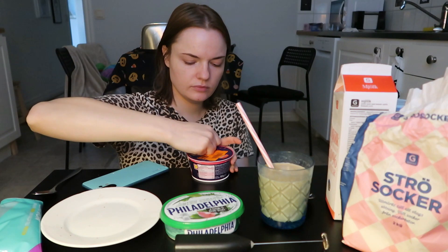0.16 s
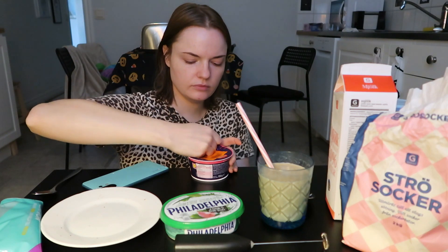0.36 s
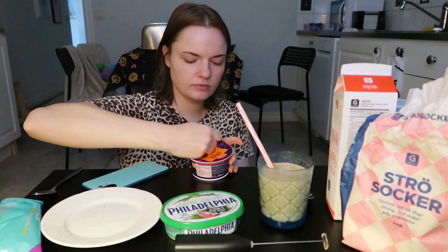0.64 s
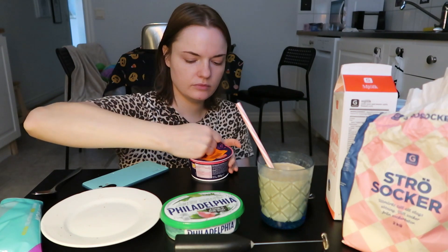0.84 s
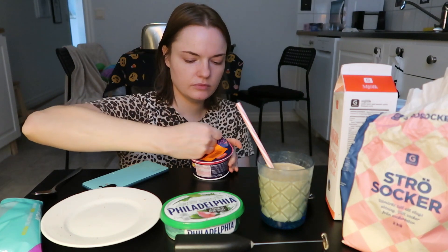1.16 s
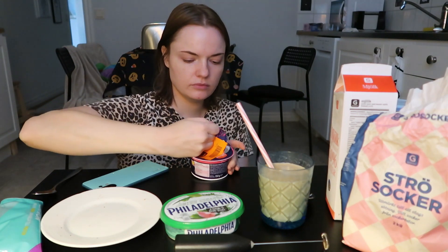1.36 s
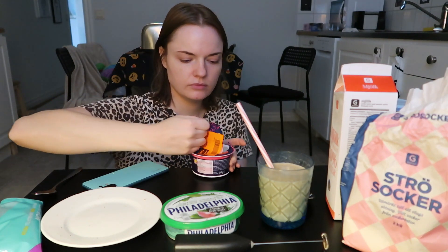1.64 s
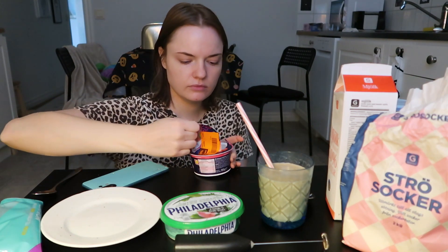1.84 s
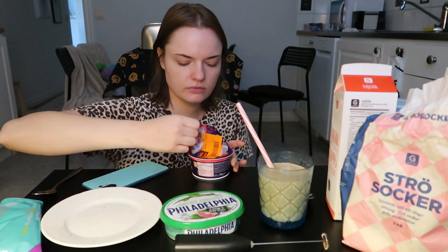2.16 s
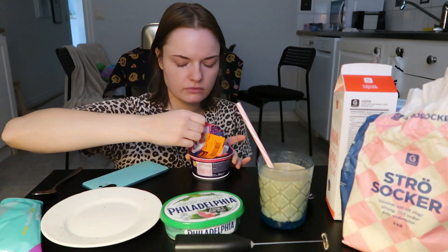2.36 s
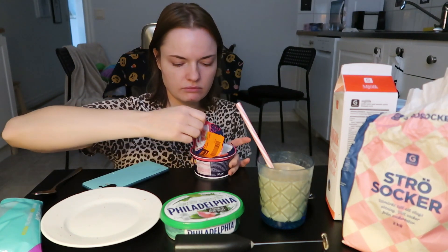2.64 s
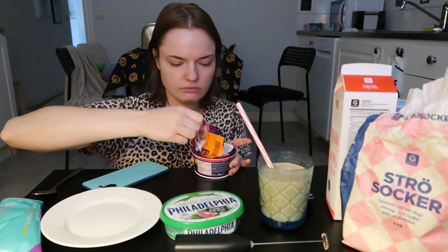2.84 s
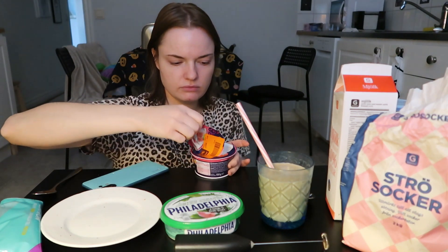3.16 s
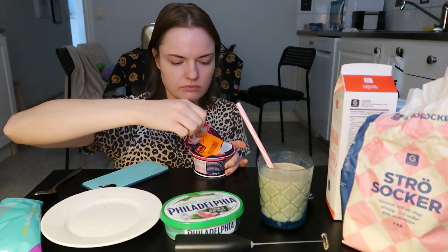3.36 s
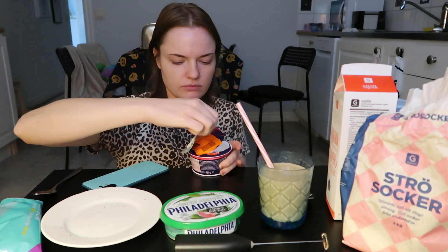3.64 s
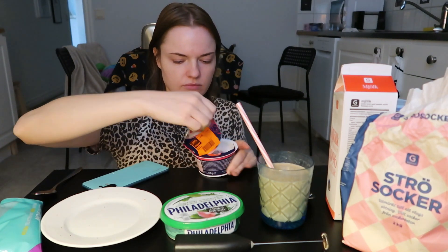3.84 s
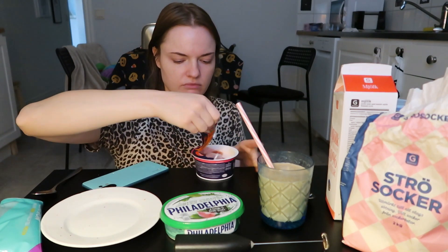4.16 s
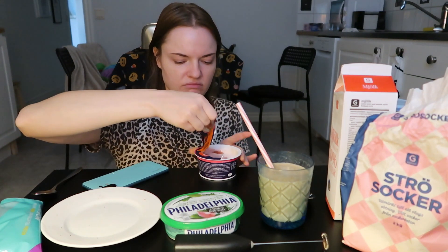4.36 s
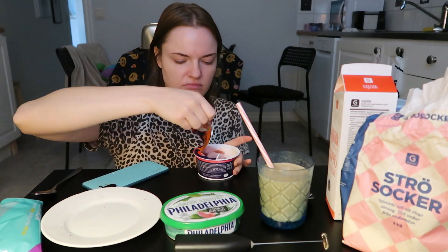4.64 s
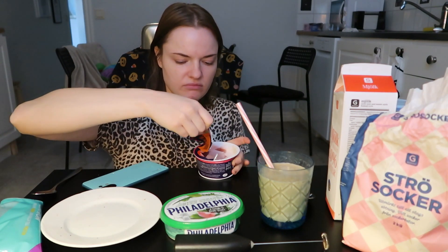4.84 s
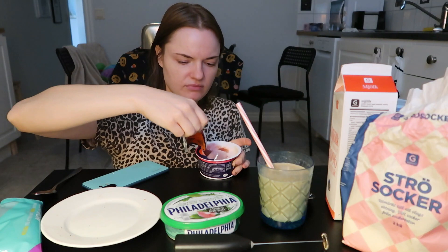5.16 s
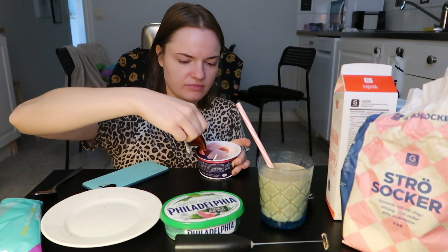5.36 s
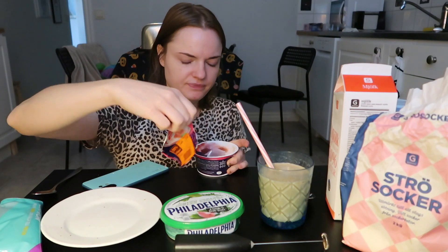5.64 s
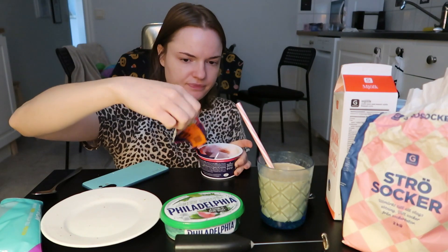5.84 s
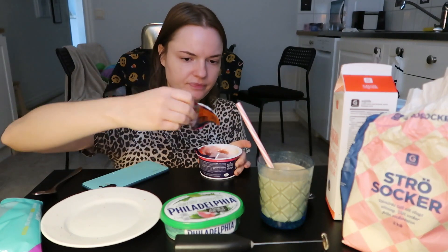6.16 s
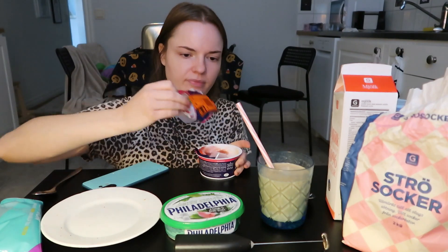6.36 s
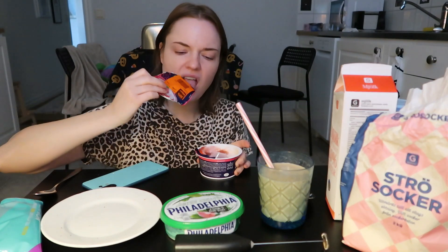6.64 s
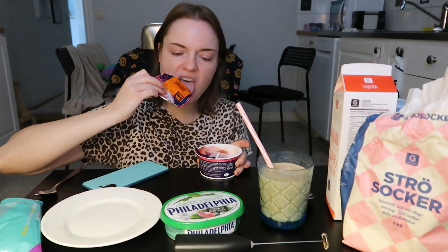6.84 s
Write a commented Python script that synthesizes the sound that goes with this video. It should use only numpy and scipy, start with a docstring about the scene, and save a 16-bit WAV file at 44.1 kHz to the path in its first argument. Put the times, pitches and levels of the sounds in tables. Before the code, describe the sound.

Close stereo microphones in a small, hard kitchen with low house rumble, faint wavering hum and hiss. A barely audible ring dies away at the start. At 0.4 s the foil cracks and the tub bumps the table softly; a lighter snap follows at 0.65. From 0.95 to 1.4 s comes the loudest passage: rapid, bright, tinny buckles with crackling, turning briefly hollow until about 1.6. It quiets, with a dull knock at 2.2 and faint crinkles and rubbing to 2.7. From 3.15 to 4.3 s dry crackles, small snaps and short stick-slip slides return, ending in a solid woody thump at 4.25. Light crinkles and very soft bumps continue from 4.6 to 5.4. A short rip peaks sharply at 5.69 s. After a lull, the loose foil crackles crisply at 6.4 to 6.7, then fades to room tone.

```python
"""Peeling the foil lid off a yogurt tub

A foil lid is peeled off a plastic tub on a kitchen table, close to a pair of microphone ports.
The foil buckles with sharp snaps (damped modes and noise cracks), the seal rips in short bursts
and the loose lid crinkles (random fractures, coloured); the tub knocks (table modes) and slides
(stick-slip grains). A small hard room answers with decaying noise, over house noise, hum and hiss.
"""
import sys
import numpy as np
from scipy import signal
from scipy.fft import rfft, irfft, next_fast_len
from scipy.io import wavfile
from scipy.ndimage import map_coordinates

SR = 44100
rng = np.random.default_rng(int(sys.argv[2]) if len(sys.argv) > 2 else 0)


def log_audio(samples):
    """Write samples as a 16-bit WAV file to the path given in sys.argv[1]."""
    # one column per channel
    frames = np.atleast_2d(samples).T
    # limit to full scale, then quantise
    limited = np.clip(frames, -1, 1)
    pcm = np.round(limited * 32767).astype(np.int16)
    wavfile.write(sys.argv[1], SR, pcm)


N = 308259

# buckles of the foil, levels before trims: start_s, lid_level_db, lid_mode_hz, crease_mode_hz,
# crease_level_db, crack_level_db, facet_pan_db (left minus right)
BUCKLES = [(0.375, -32, 895, 2550, -36, -31, -1.5), (0.418, -41, 875, 2662, -19, -34, -0.5),
           (0.673, -29.5, 570, 2670, -43.5, -55, -5), (0.953, -24.5, 703, 2660, -28.5, -19, -10.5),
           (0.980, -33, 1000, 2780, -60, -46, 1), (1.030, -30, 600, 2410, -67, -44, -2),
           (1.075, -19, 1630, 2420, -33.5, -17, -3.5), (1.166, -17.5, 1525, 2120, -61.5, -36.5, -4),
           (1.17, -24.5, 860, 2080, -30, -33.5, 2), (1.242, -17, 1460, 3730, -30, -18, -2.5),
           (1.296, -44, 1040, 2820, -32, -24, 1), (1.308, -28, 1400, 2830, -67, -26, -1.5),
           (1.4, -29.5, 1600, 3010, -31, -46, -3.5), (2.294, -50, 530, 4440, -70, -42, 3),
           (3.292, -45.5, 1120, 2460, -49.5, -59, 5), (3.423, -65, 509, 3350, -73, -32, 0),
           (3.456, -47, 1950, 2120, -47.5, -45.5, -2), (3.533, -43, 834, 3180, -63, -50, 0),
           (3.571, -43, 1040, 2550, -41.5, -45.5, 5.5), (3.752, -54, 1610, 3780, -65, -32.5, -6),
           (3.839, -30, 1950, 3420, -36.5, -30, 6.5), (4.025, -37, 550, 2580, -41.5, -34, 6),
           (4.252, -31, 1310, 2760, -32.5, -26, 6), (4.643, -48.5, 503, 2900, -56.5, -43.5, 1.5),
           (5.04, -49.5, 554, 2420, -49.5, -49.5, -2), (5.107, -41, 890, 2350, -43, -47.5, 4),
           (5.139, -34, 840, 2280, -33, -52, 0.5), (5.143, -36.5, 1610, 2770, -38.5, -41.5, 10),
           (5.685, -52, 680, 3750, -31.5, -21, -5), (5.699, -42.5, 980, 2570, -38.5, -38, 9.5),
           (6.1, -60, 538, 4440, -75, -52.5, 4)]
# colour of tiny creases in the foil: freq_hz, level_db
CREASE_COLOUR = [(600, -27), (2000, -7.5), (3500, -2.5), (6000, -2), (9500, 12), (12000, -6.5),
                 (16000, -15)]
# colour of the lid bending as a whole: freq_hz, level_db
BEND_COLOUR = [(300, -13), (800, -10), (1400, -6), (2100, -4), (2650, 1), (3200, -3), (4200, -7.5),
               (8000, -14.5)]


def amp(db):
    """Decibels to amplitude."""
    return 10 ** (np.asarray(db) / 20)


def unit(x):
    """Scale to rms 1."""
    return x / np.sqrt(np.mean(x ** 2) + 1e-20)


def along(points, hz):
    """Interpolate (Hz, value) points on a log frequency axis."""
    f, v = np.transpose(points)
    return np.interp(np.log(hz + 1), np.log(f + 1), v)


def filtered(x, response):
    """Multiply the spectrum of x by a response of frequency."""
    n = x.shape[-1]
    m = next_fast_len(n + SR // 4)
    spectrum = rfft(x, m) * response(np.fft.rfftfreq(m, 1 / SR))
    return irfft(spectrum, m)[..., :n]


def coloured(x, points, size=4096):
    """Pass x through a causal minimum-phase filter with the given (Hz, dB) points."""
    cepstrum = irfft(np.log(amp(along(points, np.fft.rfftfreq(size, 1 / SR)))))
    # fold the cepstrum onto positive time
    cepstrum[1:size // 2] *= 2
    cepstrum[size // 2 + 1:] = 0
    impulse = irfft(np.exp(rfft(cepstrum)))
    return signal.fftconvolve(x, impulse)[:len(x)]


def wobble(rate):
    """A smooth random curve with rate knots a second."""
    knots = rng.standard_normal(int(N * rate / SR) + 4)
    return map_coordinates(knots, [np.arange(N) * rate / SR])


def add(track, s, sound):
    """Mix a sound into a track at time s."""
    space = track[max(round(s * SR), 0):][:len(sound)]
    space += sound[:len(space)]


def blow(x):
    """Scale a short sound to the energy of 10 ms at rms 1."""
    return x * np.sqrt(SR / 100 / np.sum(x ** 2))


def ring(t, hz, t60, attack):
    """One damped mode with a soft attack."""
    decay = 1000 ** (-t / t60)
    return np.sin(2 * np.pi * hz * t) * decay * (1 - np.exp(-t / attack))


def grains(rate, spread_db):
    """Tiny fractures of either sign at random times, about rate a second, sizes spread in dB, rms 1."""
    hit = rng.random(N) < rate / SR
    size = amp(spread_db * np.clip(rng.standard_normal(N), -2, 2))
    return unit(hit * rng.choice([-1, 1], N) * size)


def burst(t, t60, colour):
    """A short coloured crack of decaying noise."""
    return blow(coloured(rng.standard_normal(len(t)) * amp(-60 * t / t60), colour))


def room_tone(rumble_db=-58, hiss_db=-69, apart=1.0, waver_db=2):
    """Low house noise, partly shared by the ports, a wavering appliance hum and each port's own hiss."""
    # spectrum of the house noise: freq_hz, relative_level_db
    house_colour = [(20, 5), (45, -2), (70, -2.5), (110, -11.5), (200, -13.5), (330, -22.5), (550, -25),
                    (750, -28), (1500, -44), (4000, -40), (12000, -58.5)]
    # hum of a kitchen appliance: freq_hz, rms_level_db before wavering
    hum_tones = [(48.5, -69.5), (199, -76.5), (318, -78), (425, -85.5), (538, -77)]
    common, left, right = [
        unit(filtered(rng.standard_normal(N), lambda hz: amp(along(house_colour, hz))))
        for _ in range(3)]
    rumble = amp(rumble_db) * unit(common + apart * np.array([left, right]))
    t = np.arange(N) / SR
    hum = np.zeros(N)
    for hz, db in hum_tones:
        level = np.sqrt(2) * amp(db + waver_db * wobble(4.7))
        hum += level * np.sin(2 * np.pi * hz * t + 2 * wobble(rate=40))
    return rumble + hum + amp(hiss_db) * rng.standard_normal((2, N))


def fading_ring(hz=765, db=-51, t60=0.13, haze_db=-59, blur=1.2):
    """A faint ring, blurred by a wandering phase, and its noisy haze die away at the start."""
    t = np.arange(N) / SR
    haze = amp(haze_db) * unit(coloured(rng.standard_normal(N), BEND_COLOUR))
    tone = amp(db) * np.sin(2 * np.pi * hz * t + blur * wobble(90))
    return amp(-60 * t / t60) * (tone + haze)


def tugs(uneven_db=0.93):
    """Strength of crinkle, flex and slide: every tug starts with a jerk, arches and relaxes unevenly."""
    # each tug of the hand creases and bends the lid and drags the tub, levels before shaping:
    # start_s, length_s, crinkle_level_db, flex_level_db, slide_level_db
    tug_list = [(0.51, 0.04, -78.5, -51.5, -64.5), (0.635, 0.12, -53, -66, -57),
                (0.805, 0.038, -57, -59, -55), (0.97, .07, -51.5, -58, -48),
                (1.298, 0.087, -32.5, -43, -53.5), (1.416, 0.073, -49.5, -50.5, -59.5),
                (1.552, 0.1, -37.5, -51.5, -57), (1.69, 0.19, -68, -63, -71),
                (2.165, 0.072, -47, -59.5, -60), (2.345, .025, -48, -63, -73),
                (2.448, 0.16, -59.5, -60.5, -56), (2.64, 0.059, -61.5, -61.5, -54),
                (3.15, 0.27, -51.5, -64, -67), (3.365, 0.084, -41, -53.5, -54),
                (3.564, .095, -41.5, -46.5, -48), (3.774, .018, -42, -59.5, -61),
                (3.949, 0.19, -47.5, -55.5, -51), (4.026, 0.031, -40, -55, -45.5),
                (4.21, .15, -51, -52, -45.5), (4.639, .05, -53, -60.5, -54.5),
                (4.71, .075, -48.5, -56.5, -53), (4.982, 0.017, -43.5, -51.5, -59),
                (5.035, .075, -50, -51.5, -56.5), (5.184, .07, -42.5, -55, -59.5),
                (5.335, 0.036, -44, -58.5, -63.5), (5.428, .03, -50.5, -62, -70.5),
                (5.56, .015, -51, -49, -63), (5.6, .025, -46, -49, -57), (5.706, .05, -53, -54, -57.5),
                (5.82, .08, -50, -54, -58.5), (6.43, .018, -48, -62.5, -80),
                (6.528, 0.032, -35, -58.5, -82), (6.633, 0.07, -53.5, -69.5, -86)]
    # the hands never rest entirely: crinkle_level_db, flex_level_db, slide_level_db
    hold_db = [-67, -74.5, -73]
    attack_s, release_s = 0.032, 0.085  # time to rise by 20 dB before a tug and to fall by 20 dB after
    middle_db = 5.5  # the arch is this much stronger in its middle than at its ends
    jerk_level_db, jerk_s = 3, 0.015  # extra level at the start and its time constant in dB
    t = np.arange(N) / SR
    power = amp(hold_db)[:, None] ** 2 * np.ones(N)
    for s, length, *db in tug_list:
        arch_db = middle_db * (2 * np.clip((t - s) / length, 0, 1) - 1) ** 2
        outside = np.maximum((s - t) / attack_s, (t - s - length) / release_s)
        edges_db = 20 * np.maximum(outside, 0)
        jerk_db = jerk_level_db * np.exp(-np.abs(t - s) / jerk_s)
        power += (amp(db)[:, None] * amp(jerk_db - arch_db - edges_db)) ** 2
    return np.sqrt(power) * amp(uneven_db * wobble(55))


def rustle(crinkle, flex, crinkle_db=-4.0, flex_db=-4.0, clump_db=3.0, tick_db=-7, apart_db=-3):
    """The lid gives way in clumps of tiny creases and sparser ticks; some creases face only one port."""
    clumps = amp(clump_db * wobble(180))

    def creasing():
        fine = unit(clumps * grains(rate=3000, spread_db=0.5))
        return fine + amp(tick_db) * grains(rate=130, spread_db=0)

    shared, *own = [creasing() for _ in range(3)]
    ports = []
    for creases in own:
        x = shared + amp(apart_db) * creases
        crinkling = amp(crinkle_db) * crinkle * unit(coloured(x, CREASE_COLOUR))
        bending = amp(flex_db) * flex * unit(coloured(x, BEND_COLOUR))
        ports.append(crinkling + bending)
    return np.array(ports)


def small_buckles(flex, hz=2400, octaves=.55, t60=.008, db=-8, spread_db=4, count=260):
    """Small creases flip at random, each with its own pitch, louder the harder the lid is bent."""
    out, t = np.zeros(N), np.arange(SR // 20) / SR
    places = rng.integers(N, size=count)
    variety = np.clip(rng.standard_normal((count, 2)), -2, 2)
    for at, (pitch, size) in zip(places, variety):
        flip = blow(ring(t, hz * 2 ** (octaves * pitch), t60, attack=.0003))
        add(out, at / SR, flex[at] * amp(db + spread_db * size) * flip)
    return out


def sliding(drag, slide_db=-2):
    """The tub's foot sticks and slips on the table top, a train of uneven grains."""
    # colour of the tub dragging on the table: freq_hz, level_db
    slide_colour = [(50, -27.5), (140, 0.5), (240, -6.5), (320, 0), (390, 1.5), (560, -11), (900, -16.5),
                    (2000, -36.5)]
    return amp(slide_db) * drag * unit(coloured(grains(rate=710, spread_db=4), slide_colour))


def buckles(lid_t60, crease_t60, ring_db, sheet_db, lid_db=-15, crease_db=-9, sheet_t60=0.0095, delay=.0008):
    """Each buckle rings the lid and the flipped crease with neighbouring modes; its facet favours a port."""
    # crowd of neighbouring foil modes: multiple_of_main_mode, level_db
    sheet_modes = [(.35, -23), (.55, -3.5), (0.751, -1), (1.05, 2.5), (1.501, -6.5), (3.001, -12.5),
                   (6, -31)]
    out, t = np.zeros((2, N)), np.arange(SR // 20) / SR
    for s, low_db, low_hz, high_hz, high_db, _, pan_db in BUCKLES:
        lid = (low_hz, low_db + lid_db, lid_t60)
        crease = (high_hz, high_db + crease_db, crease_t60)
        for hz, db, t60 in (lid, crease):
            crowd = burst(t, sheet_t60, [(multiple * hz, level) for multiple, level in sheet_modes])
            mode = blow(ring(t, hz, t60, attack=0.00095))
            snap = amp(db + ring_db) * mode + amp(db + sheet_db) * crowd
            add(out[0], s + delay, amp(pan_db / 2) * snap)
            add(out[1], s + delay, amp(-pan_db / 2) * snap)
    return out


def cracks(crack_t60=0.013, crack_db=-7.0, apart_db=-5, delay=.0008):
    """The sharp edge of each buckle, a noise crack a little different at each port."""
    out, t = np.zeros((2, N)), np.arange(SR // 20) / SR
    for s, *_, db, _ in BUCKLES:
        shared = burst(t, crack_t60, CREASE_COLOUR)
        for port in out:
            own = amp(apart_db) * burst(t, crack_t60, CREASE_COLOUR)
            add(port, s + delay, amp(db + crack_db) * (shared + own))
    return out


def rips(edge=0.0042):
    """Glue threads break in a dense run: crackle, the shaking tub and fine fizz."""
    # the seal lets go or the lid crumples, the shortest runs staying below these levels:
    # start_s, length_s, crackle_level_db, tub_body_level_db, fizz_level_db
    rip_list = [(0.383, 0.0041, -23.5, -29, -42.5), (0.389, 0.0098, -41, -32.5, -60),
                (0.632, 0.0037, -42.5, -43, -56), (0.953, .002, -41, -52.5, -24),
                (2.202, 0.0079, -54, -39.5, -68), (3.427, .002, -29, -65, -32),
                (3.753, .003, -38, -60, -50), (5.545, .004, -44, -50, -62), (5.643, 0.017, -31, -46, -44.5),
                (5.671, 0.012, -31.5, -47, -45), (5.686, 0.0027, -20, -37, -14),
                (6.419, 0.0025, -36.5, -68.5, -48.5), (6.619, 0.006, -31, -56, -45.5),
                (6.636, 0.0021, -31, -70, -44)]
    # colour of the tub shaken by the tearing seal: freq_hz, level_db
    tub_colour = [(60, -8), (150, 8.5), (400, -0.5), (850, 3), (1400, -11), (2600, -5), (6000, -12.5)]
    # colour of the finest glue threads: freq_hz, level_db
    fizz_colour = [(4000, -21), (9000, -4.5), (12000, 7), (15500, 6.5)]
    t = np.arange(N) / SR
    levels = np.zeros((3, N))
    for s, length, *db in rip_list:
        inside = np.minimum(t - s, s + length - t)
        levels += amp(db)[:, None] * np.clip(inside / edge + .5, 0, 1)
    breaks = grains(rate=10000, spread_db=-1.5)
    colours = (CREASE_COLOUR, tub_colour, fizz_colour)
    return [level * unit(coloured(breaks, colour)) for level, colour in zip(levels, colours)]


def knocks(knock_db=-1, delay=0.00074):
    """The full tub thumps the table top; a soft contact wakes only the low modes."""
    # the tub meets the table: start_s, peak_level_db before trim and colour,
    # soft_hz (above it the contact is too soft to drive the table)
    knock_list = [(0.3991, -20, 501.4), (2.203, -24, 690), (3.96, -38, 900), (4.027, -26.5, 920),
                  (4.2527, -12.5, 903), (5.063, -32, 106), (5.204, -34, 122), (5.335, -38, 147),
                  (5.441, -44.5, 70)]
    # modes of tub and table top: freq_hz, level_db, t60_s
    table_modes = [(85, -7, 0.12), (147, -1.5, 0.091), (236, -0.5, 0.04), (320, 4, 0.037), (372, -11, 0.14),
                   (469, -2.5, 0.011), (674, -15.5, 0.0823), (883, 0, 0.0089), (1130, -3.5, 0.03)]
    # the table top radiates little deep bass: freq_hz, level_db
    foot_colour = [(25, -18), (60, -9), (120, -2.5), (2000, 1.5)]
    out, t = np.zeros(N), np.arange(SR // 3) / SR
    for s, db, soft_hz in knock_list:
        thump = np.zeros(len(t))
        for hz, level, t60 in table_modes:
            drive = amp(level + rng.normal(0, 1)) / (1 + (hz / soft_hz) ** 3)
            thump += drive * ring(t, hz, t60, attack=0.00035)
        add(out, s + delay, amp(db + knock_db) * thump / np.abs(thump).max())
    return coloured(out, foot_colour)


def tub_air(flex, width_hz, hz=1350, db=-4, fade=0.062):
    """While the lid is only partly open, the air in the tub resonates, driven by creasing grains."""
    # the lid is partly open: start_s, end_s
    gap_times = [1.2, 1.637]
    t = np.arange(N) / SR
    gap = np.clip(np.minimum(t - gap_times[0], gap_times[1] - t) / fade, 0, 1)

    def resonance(f):
        damping = 1j * f * width_hz
        return (damping / (hz ** 2 - f ** 2 + damping)) ** 2

    hollow = filtered(grains(rate=900, spread_db=3), resonance)
    return amp(db) * gap * flex * unit(hollow)


def direct(x, pan_db=0, turn=0):
    """A source at both ports, right one first; sound spread by the table top arrives turned in phase."""
    lead_s = 0.0003368  # by which the sound reaches the right port first
    side = np.array([[-1], [1]])
    pair = filtered(x * np.ones((2, 1)), lambda hz: np.exp(1j * (np.pi * hz * lead_s + turn / 2) * side))
    return pair * amp([[pan_db / 2], [-pan_db / 2]])


def kitchen(x, gap=0.00096, size=8192):
    """The room's diffuse answer at one port: bass dies soonest; each piece of sound gets a fresh tail."""
    # decay of the room: freq_hz, t60_s
    room_decay = [(150, 0.1), (500, 0.25), (1500, 0.26), (4000, 0.24), (9000, 0.3), (16000, 0.39)]
    # colour of the echo: freq_hz, level_db
    wall_colour = [(100, -2.5), (600, 3.5), (1500, 2.5), (4000, 3), (9000, 1.5), (15000, -9.5)]
    out = np.zeros(N)
    window = signal.get_window("hann", size)
    # overlapping pieces of the sound each get a fresh noise tail
    for start in range(0, N - size // 2, size // 2):
        hz, t, z = signal.stft(rng.standard_normal(SR // 2), SR, nperseg=256)
        decay = amp(-60 * t / along(room_decay, hz)[:, None])
        tail = signal.istft(z * decay, SR, nperseg=256)[1]
        tail *= np.clip(np.arange(len(tail)) / SR / gap - .5, 0, 1)  # silent until the first echo
        piece = x[start:start + size]
        answer = signal.fftconvolve(piece * window[:len(piece)], tail / np.linalg.norm(tail))
        add(out, start / SR, answer)
    return coloured(out, wall_colour)


def echo(x, pan_db=2):
    """The room's answer, with different noise tails at each port."""
    return np.array([kitchen(x), kitchen(x)]) * amp([[pan_db / 2], [-pan_db / 2]])


def scene():
    """Lid and tub heard directly, through the table top and by way of the walls."""
    # the ports face one facet of the foil; the walls hear all facets, so their modes blur
    facing = buckles(lid_t60=0.013, crease_t60=0.012, ring_db=4, sheet_db=1.5)
    scattered = buckles(lid_t60=0.0044, crease_t60=0.0031, ring_db=-15.5, sheet_db=-4.5).mean(axis=0)
    crinkle, flex, drag = tugs()
    crackle, body, fizz = rips()
    sharp = cracks()
    foil = crackle + rustle(crinkle, flex) + small_buckles(flex) + tub_air(flex, width_hz=590)
    thumps = knocks()
    rubbing = body + sliding(drag) + fading_ring()

    near = direct(facing) + direct(sharp, pan_db=3.1) + direct(foil, pan_db=2.5) + direct(fizz, pan_db=-8)
    table = direct(thumps, pan_db=12.5, turn=1.0) + direct(rubbing, pan_db=8.0, turn=0.43)
    to_walls = scattered + amp(-6) * foil.mean(axis=0)
    to_walls += amp(-5.5) * (sharp.mean(axis=0) + fizz + thumps + rubbing)
    return near + table + echo(to_walls) + room_tone()


def record(dry):
    """Each port's cavity colours the sound; peaks clip at full scale and the top is cut at 16 kHz."""
    # response of the left microphone port: freq_hz, level_db
    left_port = [(200, 5.5), (1400, 9.5), (3000, 2.5), (5200, 8.5), (7000, 6.5), (8300, 10), (9500, 0),
                 (11000, 1), (16000, 1.5)]
    # response of the right microphone port: freq_hz, level_db
    right_port = [(200, 5), (1400, 11.5), (3000, 4), (5200, 5), (6800, -0.5), (7700, -10), (9200, -3.5),
                  (11000, 4), (16000, 1)]
    ports = np.array([coloured(dry[0], left_port), coloured(dry[1], right_port)])
    return filtered(np.clip(ports, -1, 1), lambda hz: hz < 16000)


dry = scene()
out = record(dry)
log_audio(out)
```